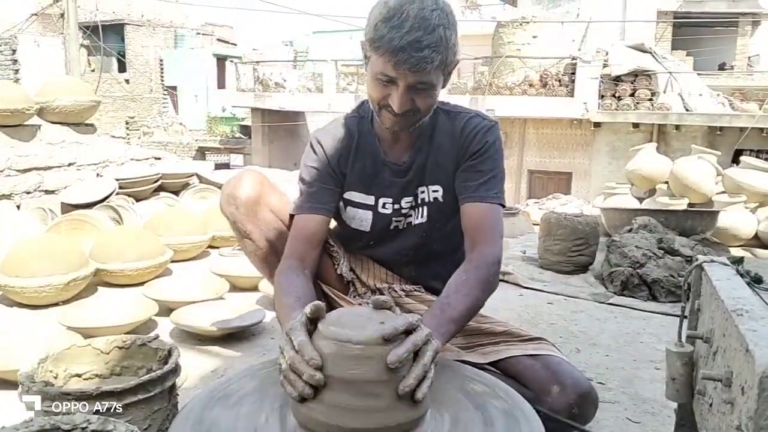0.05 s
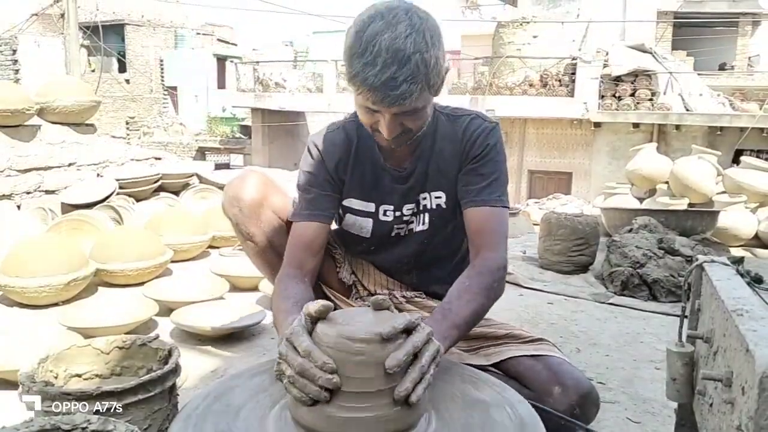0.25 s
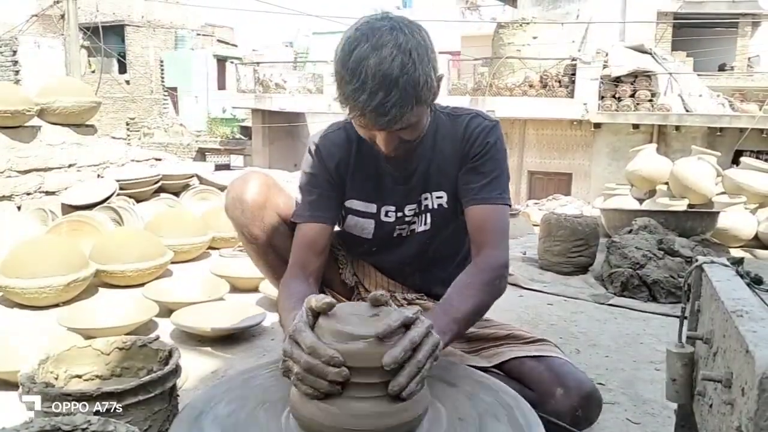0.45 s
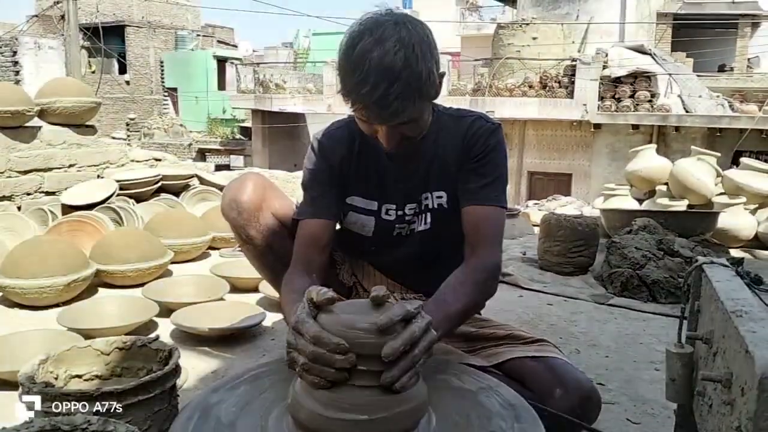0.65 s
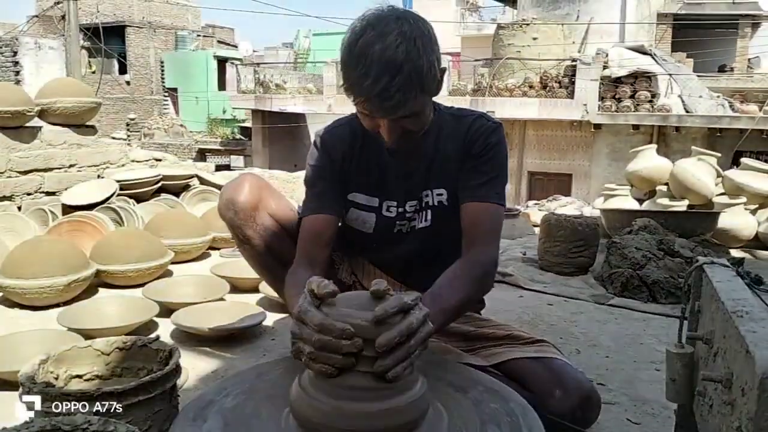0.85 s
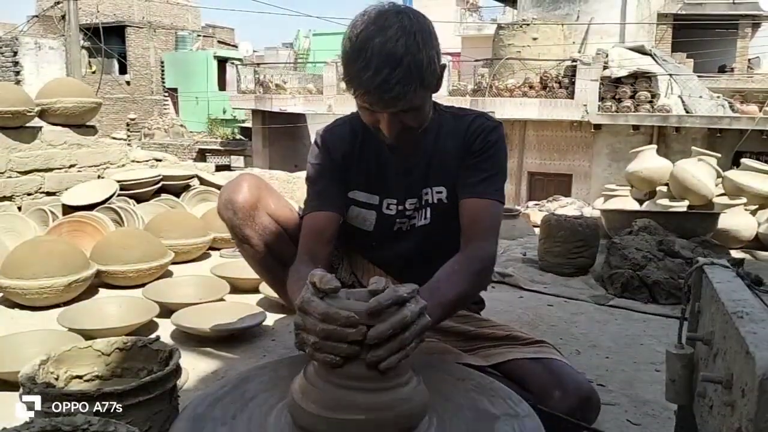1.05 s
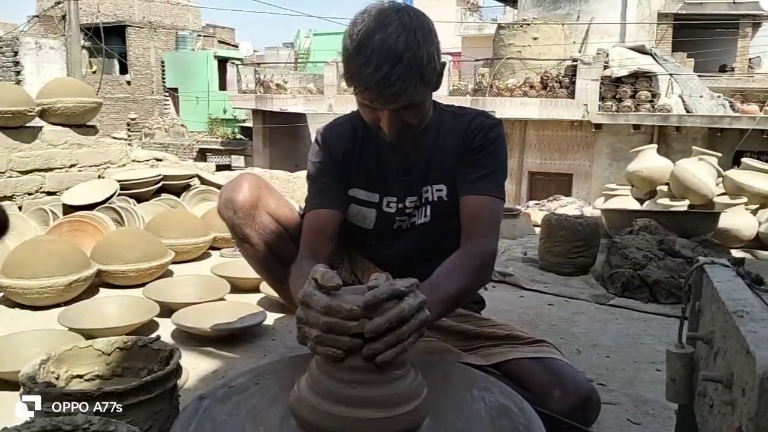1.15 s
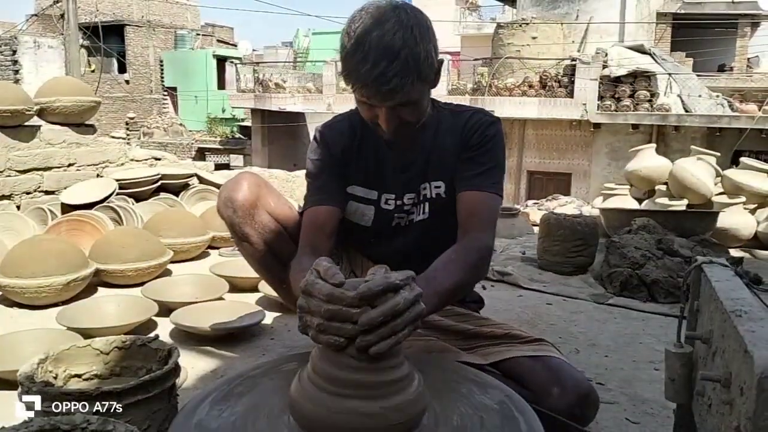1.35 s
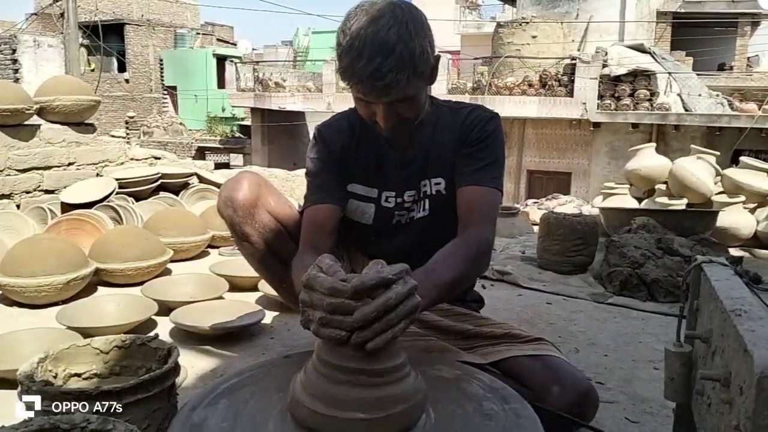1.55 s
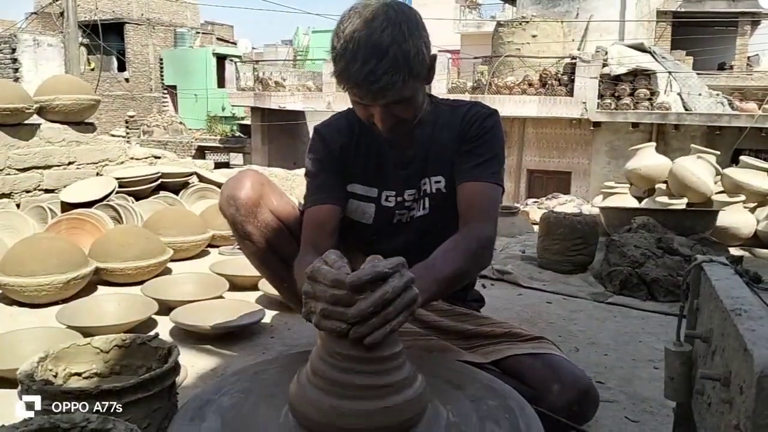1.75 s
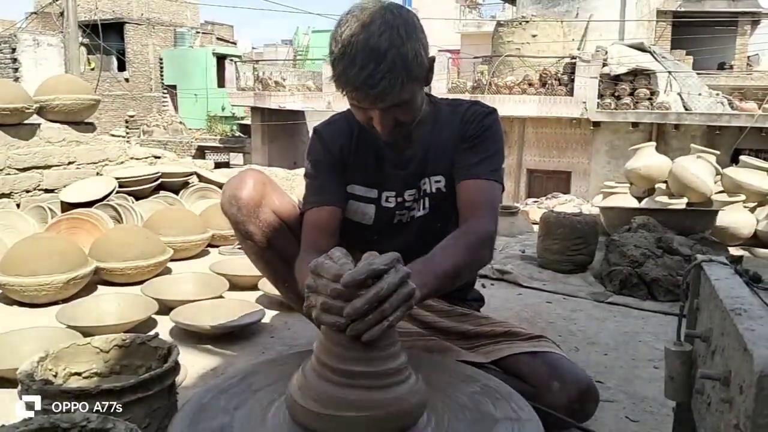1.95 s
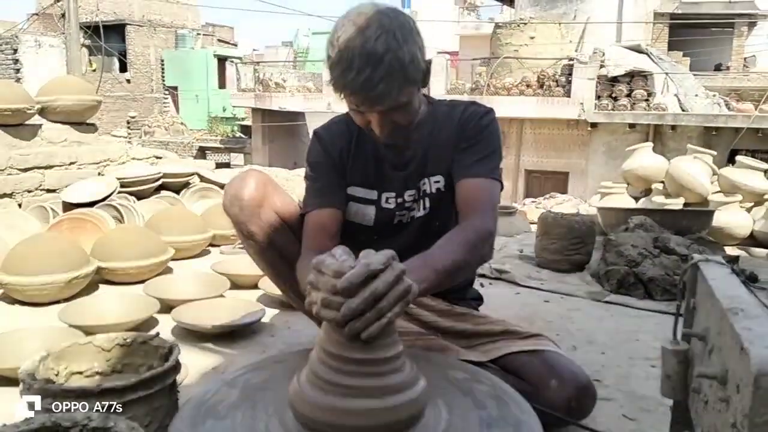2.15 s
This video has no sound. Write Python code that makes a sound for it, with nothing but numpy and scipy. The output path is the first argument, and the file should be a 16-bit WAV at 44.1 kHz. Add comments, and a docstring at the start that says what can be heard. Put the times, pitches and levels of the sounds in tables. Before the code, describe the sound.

Steady low rumble and wet rubbing of clay on a spinning potter's wheel in an open yard. A tap, a hard double clack and a dull pot knock come before the middle, then rough wind batters the close microphone and eases.

```python
"""Shaft hum, a low rumble and the hiss of wet clay on a motor-driven potter's wheel in an open yard come first.
Hum is a few sine harmonics; ticks at set angles of each turn, a ringing frame and clay rub are filtered noise.
Gusts of wind, bands and bursts of noise plus short swings, buffet the microphone, hardest past the middle.
Later a light tap, hard clacks and a hollow pot knock: noise cracks with decaying modes, scattered by the yard."""
import sys
import numpy as np
from scipy import signal
from scipy.fft import rfft, irfft
from scipy.io import wavfile
from scipy.ndimage import uniform_filter1d, minimum_filter1d

SR = 44100
rng = np.random.default_rng(int(sys.argv[2]) if len(sys.argv) > 2 else 0)


def transcribe(u):
    """Save the signal u as a 16-bit wav file named by the first command-line argument.

    u: samples, shape (n,) or (channels, n), limited to [-1, 1]; the rate is SR.
    q: integer samples, one column per channel.
    """
    v = np.clip(np.atleast_2d(u).T, -1, 1)
    q = np.round(v * 32767).astype(np.int16)
    wavfile.write(sys.argv[1], SR, q)


N = 97020


def undb(db):
    """dB to amplitude."""
    return 10 ** (np.asarray(db) / 20)


def unit(x):
    """Scale to an RMS of 1."""
    return x / np.sqrt(np.mean(x ** 2))


def curve(rows):
    """Rows (s, value) joined by straight lines."""
    return np.interp(np.arange(N) / SR, *np.array(rows).T)


def butter(x, order, hz, kind="low"):
    """Butterworth filter."""
    return signal.sosfilt(signal.butter(order, hz, kind, fs=SR, output="sos"), x)


def colour(x, points):
    """Causal, minimum-phase filter through (Hz, dB) points, by folding the cepstrum."""
    hz, db = np.array(points).T
    size = 2 * len(x)
    f = np.maximum(np.fft.rfftfreq(size, 1 / SR), 1)
    gain = undb(np.interp(np.log(f), np.log(hz), db))
    cepstrum = irfft(np.log(gain))[:len(x)]
    cepstrum[1:] *= 2
    response = np.exp(rfft(cepstrum, size))
    return irfft(rfft(x, size) * response)[:len(x)]


def resonate(x, hz, width_hz):
    """One resonance."""
    return signal.lfilter(*signal.iirpeak(hz, hz / width_hz, fs=SR), x)


def walk(rate_hz):
    """Slow random drift with an RMS near 1."""
    k = int(SR / rate_hz)
    steps = np.repeat(rng.standard_normal(N // k + 1), k)
    return unit(uniform_filter1d(uniform_filter1d(steps, k), k)[:N])


SHAFT_HZ = 24.715
# motor hum: shaft_multiple, level_db
HUM_HARMONICS = [(3, -38), (4, -45.5), (5, -45), (12, -61)]


def hum():
    """Harmonics of the shaft rate share one slightly wandering phase."""
    phase = 2 * np.pi * np.cumsum(SHAFT_HZ * (1 + 0.0018 * walk(3))) / SR
    out = np.zeros(N)
    for multiple, level_db in HUM_HARMONICS:
        start_phase = 2 * np.pi * rng.random()
        out += undb(level_db) * np.sqrt(2) * np.sin(multiple * phase + start_phase)
    return out


# rough spots of the drive: angle_turns, strike_db
ROUGH_SPOTS = [(.07, -8), (.17, -8), (0.431, 6), (0.599, -12), (0.692, -5), (0.842, 3.5)]
TICK_SCATTER_DB, TICK_JITTER_S, TICK_DECAY_S = 2.4, 0.00037, 0.0006


def drive_contact():
    """Rough spots strike near the same angles each turn, unequally hard; each strike decays fast."""
    angle_turns, strike_db = np.array(ROUGH_SPOTS).T
    turns = np.arange(int(N / SR * SHAFT_HZ) + 1)[:, None]
    late, strength = rng.standard_normal((2, len(turns), len(angle_turns)))
    start_s = (turns + angle_turns) / SHAFT_HZ + TICK_JITTER_S * late
    at = (start_s * SR).astype(int)
    size = undb(strike_db + TICK_SCATTER_DB * np.clip(strength, -2, 2))
    heard = (at >= 0) & (at < N)
    pulses = np.bincount(at[heard], size[heard], N)
    return signal.lfilter([1], [1, -np.exp(-1 / (TICK_DECAY_S * SR))], pulses)


# dry tick spectrum: freq_hz, gain_db
TICK_SPECTRUM = [(2000, 6), (5500, 11), (8000, 4), (10300, -33.5), (11500, 4.5), (13500, 2), (16000, 2.5)]
# tick level: time_s, level_db
TICK_LEVEL_DB = [(0, -59.5), (.5, -55.5), (.9, -61), (1.25, -59), (1.7, -62.5), (2.2, -61)]


def ticks(contact):
    """Each strike is a brief burst of noise."""
    return undb(curve(TICK_LEVEL_DB)) * unit(colour(contact * rng.standard_normal(N), TICK_SPECTRUM))


def rattle_envelope(contact):
    """Drive roughness: the level follows the strikes slightly and drifts at random."""
    pulse_level = signal.detrend(unit(uniform_filter1d(contact, size=180)))
    return unit(undb(0.25 * pulse_level + 1.06 * walk(45.14)))  # both factors in dB


# frame resonances: freq_hz, width_hz, level_db
FRAME_MODES = [(690, 90, 0), (811.5, 23, 5.5), (1226, 9.8, -3.5), (1950, 13, -3), (1922, 4.9, 5.5),
               (2280, 9.7, 4), (2360, 16, -12.5), (2712, 37, 6), (3200, 58, -10.5), (4890, 42, -5.5)]
FRAME_DB = -45.5


def frame(rattle, load):
    """Rattling noise from the drive rings the frame's resonances, scaled by the clay load."""
    drive = rattle * rng.standard_normal(N)
    rings = [undb(level_db) * unit(resonate(drive, hz, width_hz)) for hz, width_hz, level_db in FRAME_MODES]
    return undb(FRAME_DB) * unit(load) * unit(sum(rings))


# wheel and wet clay rubbing: freq_hz, gain_db
RUB_SPECTRUM = [(200, 9.5), (500, -3), (780, 7), (930, -8.5), (1100, 0), (1650, 0), (2200, 3), (2900, -2),
                (3900, -3), (4550, -12), (5400, -13), (6800, -19), (8500, -39), (9600, -56), (10800, -54.5),
                (11500, -36), (13300, -35.5), (15800, -37)]
GRIT_DB, GRIT_SPREAD_DB, GRAINS_PER_S = -13.5, 2.7, 900


def rub(rattle, load):
    """Friction noise plus sparse grit grains of uneven size."""
    grain_gain = undb(GRIT_SPREAD_DB * np.minimum(rng.exponential(size=N), 4))
    grit = (rng.random(N) < GRAINS_PER_S / SR) * rng.standard_normal(N) * grain_gain
    friction = rattle * rng.standard_normal(N)
    return load * unit(colour(friction + undb(GRIT_DB) * unit(grit), RUB_SPECTRUM))


# clay load on the wheel: time_s, rub_level_db
CLAY_LOAD_DB = [(0, -37), (.5, -36), (.9, -38), (1.01, -35), (1.1, -37), (1.3, -37), (1.5, -40.5),
                (1.85, -40), (2.2, -39.5)]


def wheel():
    """Shaft hum, ticking drive, ringing frame and gritty rub; one roughness drives frame and rub."""
    contact = drive_contact()
    rattle = rattle_envelope(contact)
    load = undb(curve(CLAY_LOAD_DB))
    return hum() + ticks(contact) + frame(rattle, load) + rub(rattle, load)


# treble of the wet slip: time_s, level_db
FIZZ_LEVEL_DB = [(0, -75), (.7, -72), (1.0, -70), (1.3, -66.5), (1.42, -68), (1.55, -74.5), (1.85, -70),
                 (2.2, -72)]
FIZZ_EDGE_HZ = 11500


def fizz():
    """Tiny bubbles bursting in the slip under the fingers, as flickering high-passed noise."""
    spray = butter(rng.standard_normal(N), 4, FIZZ_EDGE_HZ, "high")
    return undb(curve(FIZZ_LEVEL_DB) + 1.5 * walk(120)) * unit(spray)


# motor rumble through the stand: freq_hz, gain_db
DRONE_SPECTRUM = [(15, -36.5), (28, -13), (55, -10.5), (80, 0), (125, -1.5), (185, -3), (240, -16),
                  (320, -27.5), (600, -46.5), (3000, -89)]
DRONE_DB = -34


def drone():
    """The motor shakes the stand: a low rumble of noise, its level partly evened out."""
    shake = colour(rng.standard_normal(2 * N), DRONE_SPECTRUM)[N:]
    power = uniform_filter1d(shake ** 2, size=1400)
    return undb(DRONE_DB) * unit(shake / power ** .3)


# slow swell of the wind: time_s, level_db
GUST_LEVEL_DB = [(0, -43), (.12, -35.5), (.2, -43), (.36, -24.5), (.45, -25), (.6, -38.5), (.75, -24.5),
                 (.85, -39.5), (.98, -28.5), (1.15, -23.5), (1.3, -16), (1.45, -20), (1.55, -24),
                 (1.65, -17), (1.78, -35.5), (1.89, -29.5), (2.02, -26), (2.13, -47), (2.2, -25)]
# turbulence bands: centre_hz, breeze_db, growth_db_per_gust_db
TURBULENCE_BANDS = [(25.5, -17, 0.2), (41.4, -17.5, 0), (70.6, -7.5, 0.27), (112, -2.5, 0.82),
                    (164, -4.5, 1.43), (240.3, -17, 1.7), (340, -23, 0.5), (464.5, -30.5, 1.7),
                    (706, -40, 5.7), (1000, -46, 0)]
BREEZE_DB, WIND_FLICKER_DB = -17.5, 2
WIND_STEADY = 0.46  # 0 leaves each band's swells, 1 flattens them


def wind():
    """Turbulence on the microphone: bands of noise, each growing with the gust at its own rate."""
    gust_db = curve(GUST_LEVEL_DB) - BREEZE_DB + WIND_FLICKER_DB * walk(70)
    out = np.zeros(N)
    for hz, breeze_db, growth in TURBULENCE_BANDS:
        band = butter(rng.standard_normal(2 * N), 3, [hz / 1.334, hz * 1.291], "band")[N:]
        swell = np.sqrt(uniform_filter1d(band ** 2, size=1500))
        out += unit(band / swell ** WIND_STEADY) * undb(BREEZE_DB + breeze_db + growth * gust_db)
    return out


# wind buffets: start_s, hold_s, level_db, upper_edge_hz
WIND_BUFFETS = [(.213, 0.024, -19, 185), (.305, .035, -20, 188), (.347, 0.034, -16, 171),
                (.449, .01, -21, 281), (0.475, 0.0086, -21.5, 260), (0.628, 0.0081, -19.5, 138),
                (.73, 0.046, -22.5, 205), (0.901, .05, -20.5, 170), (1.011, 0.034, -15, 111),
                (1.06, 0.011, -17, 248), (1.086, .018, -22.5, 282), (1.138, 0.019, -16.5, 324),
                (1.162, 0.034, -13.5, 227), (1.205, 0.03, -15.5, 250), (1.257, 0.023, -11, 400),
                (1.287, 0.023, -8, 400), (1.312, .016, -10.5, 170.6), (1.338, 0.028, -11.5, 382),
                (1.393, 0.0145, -22.5, 530), (1.412, 0.017, -10.5, 280), (1.437, 0.018, -10, 350),
                (1.465, 0.024, -9, 239), (1.522, 0.042, -17.5, 287), (1.578, 0.011, -19, 280),
                (1.599, .025, -11.5, 368), (1.644, 0.0071, -14, 375), (1.709, 0.02, -20, 191),
                (1.924, 0.031, -18, 190), (1.969, 0.028, -25, 260)]
BUFFET_ATTACK_S, BUFFET_RELEASE_S, BUFFET_WIDTH_OCTAVES = 0.0015, 0.0046, 1.73


def buffets():
    """Bursts of turbulence catch the microphone suddenly, hold a moment and let go."""
    t = np.arange(SR // 4) / SR
    out = np.zeros(N + len(t))
    for start_s, hold_s, level_db, hz in WIND_BUFFETS:
        swirl = butter(rng.standard_normal(2 * len(t)), 4, hz)
        swirl = butter(swirl, 2, hz / 2 ** BUFFET_WIDTH_OCTAVES, "high")[len(t):]
        swirl = swirl / np.sqrt(uniform_filter1d(swirl ** 2, size=700))
        release = np.exp(-np.maximum(t - hold_s, 0) / BUFFET_RELEASE_S)
        shape = np.minimum(t / BUFFET_ATTACK_S, 1) * release
        at = int(start_s * SR)
        out[at:at + len(t)] += undb(level_db) * shape * swirl
    return out[:N]


# single eddies thumping the microphone: start_s, level_db, swing_hz
WIND_EDDIES = [(0.348, -7, 135), (.372, -5.5, 83), (0.509, -6.5, 116), (.763, -6, 97.5),
               (1.066, -10.5, 213), (1.165, 0, 164), (1.224, -8.5, 150), (1.261, 0, 252), (1.296, -1, 220),
               (1.309, -3.5, 160), (1.338, -7, 180), (1.44, -2, 260), (1.601, -10, 302), (1.619, -8, 200),
               (1.646, -6, 204)]
EDDY_CYCLES = 0.37  # from onset to envelope peak


def eddies():
    """Each eddy is a short swing of pressure that dies within a couple of cycles."""
    out = np.zeros(N)
    for start_s, level_db, hz in WIND_EDDIES:
        cycles = np.maximum(np.arange(N) / SR - start_s, 0) * hz
        age = cycles / EDDY_CYCLES
        out += undb(level_db) * age * np.exp(1 - age) * np.sin(2 * np.pi * cycles)
    return out


WIND_SKEW = 0.21  # strong pushes come out sharper than pulls


def air():
    """All wind on the microphone; a squared term makes pressure grow faster than flow."""
    flow = wind() + buffets() + eddies()
    return flow + WIND_SKEW * butter(flow ** 2, 2, 250, "high")


CONTACT_S = 0.0014


def blows(events, modes, crack_spectrum, crack_t60_s, ring_db):
    """Every blow is a short crack and the ring of the struck body; softer contacts are duller."""
    t = np.arange(SR // 2) / SR
    ring = np.zeros(len(t))
    for hz, mode_db, t60_s in modes:
        decay = np.exp(-np.log(1000) * t / t60_s)
        ring += undb(mode_db + ring_db) * decay * np.sin(2 * np.pi * hz * t)
    out = np.zeros(N + len(t))
    for start_s, level_db, edge_hz in events:
        crack = unit(colour(rng.standard_normal(len(t)), crack_spectrum))
        crack = crack * np.exp(-np.log(1000) * t / crack_t60_s)
        blow = (crack + ring) * np.minimum(t / CONTACT_S, 1)
        at = int(start_s * SR)
        out[at:at + len(t)] += undb(level_db) * butter(blow, 2, edge_hz)
    return out[:N]


# dull crack of a soft contact, for taps and knocks: freq_hz, gain_db
KNOCK_SPECTRUM = [(300, -5), (550, -4), (800, -3.5), (1400, -1.5), (2400, -6.5), (3400, -2), (4600, -25.5),
                  (9000, -55), (16000, -60)]
KNOCK_T60_S = 0.04
# light tap on fired clay: start_s, level_db, upper_edge_hz
TAP_EVENTS = [(.622, -31.5, 2500)]
# fired clay modes: freq_hz, mode_db, t60_s
FIRED_CLAY_MODES = [(1040, -1.5, 0.075), (1110, -1, 0.054), (1314, -6, .05)]


def taps():
    """A light tap rings a few modes of fired clay."""
    return blows(TAP_EVENTS, FIRED_CLAY_MODES, KNOCK_SPECTRUM, KNOCK_T60_S, ring_db=2)


# hard clacks: start_s, level_db, upper_edge_hz (lower for a softer contact)
CLACK_EVENTS = [(.7113, -16.5, 14000), (.7186, -20, 14000), (.7445, -27.5, 8000), (.8814, -34, 5020),
                (.9193, -33, 3000), (1.0026, -35.5, 5000), (1.2535, -34.5, 4000), (1.822, -35.5, 5000),
                (2.1031, -36, 4000), (2.1455, -39, 4500)]
# modes of the hard body: freq_hz, mode_db, t60_s
HARD_BODY_MODES = [(551, -2, .07), (975, -1.5, 0.033), (1183, -4, 0.066), (1505, -0.5, 0.034),
                   (1885, -1.5, .045), (2760, -0.5, 0.032), (2847, -3, .045), (3433, -1.5, 0.03),
                   (3840, -5, .04), (4408, -8, .04)]
# crack of the hard contact: freq_hz, gain_db
CLACK_SPECTRUM = [(300, 1), (1200, 0), (4200, 7), (5500, -9), (8000, -18.5), (10300, -34.5), (13000, -6),
                  (16000, -22)]


def clacks():
    """Hard contacts with a bright crack and a short ring."""
    return blows(CLACK_EVENTS, HARD_BODY_MODES, CLACK_SPECTRUM, crack_t60_s=0.028, ring_db=-4)


# knock on a pot, then its softer settling contact: start_s, level_db, upper_edge_hz
KNOCK_EVENTS = [(.8118, -20.5, 4200), (.8198, -22.5, 1500)]
# hollow pot modes: freq_hz, mode_db, t60_s
HOLLOW_POT_MODES = [(383, 13.5, 0.039), (406, 4, 0.099), (540, 7, 0.077), (1086, -4.5, 0.052),
                    (1222, -2, 0.04), (1554, -10, 0.044), (1667, -2.5, 0.075), (2625, -16.5, .06),
                    (3200, 3, .015)]


def knocks():
    """A hollow pot rings mainly in its low modes, then settles with a second, soft contact."""
    return blows(KNOCK_EVENTS, HOLLOW_POT_MODES, KNOCK_SPECTRUM, KNOCK_T60_S, ring_db=-3.5)


YARD_GAIN, YARD_T60_S, YARD_GAP_S = 0.1262, 0.41, 0.008  # gain: about -18 dB


def yard(x):
    """Short, dull scatter from walls and stacked pots: convolution with a decaying noise tail."""
    t = np.arange(SR // 2) / SR
    noise = resonate(rng.standard_normal(len(t)), 1300, 2500)
    tail = noise * np.exp(-np.log(1000) * t / YARD_T60_S) * (t > YARD_GAP_S)
    return x + YARD_GAIN * signal.fftconvolve(x, tail / np.linalg.norm(tail))[:N]


def scene():
    """Wheel, slip, motor and wind throughout; only the blows are scattered by the yard."""
    struck = yard(taps() + clacks() + knocks())
    return (wheel() + fizz() + drone() + air() + struck)[None]


def record(dry):
    """A limiter holds the strongest peaks under full scale; a steep low-pass cuts the top."""
    ceiling, top_hz = .95, 15750
    needed_gain = ceiling / np.maximum(abs(dry), ceiling)
    gain = uniform_filter1d(minimum_filter1d(needed_gain, size=600), size=300)
    limited = dry * uniform_filter1d(gain, size=300)
    return signal.sosfilt(signal.ellip(10, .2, 80, top_hz, fs=SR, output="sos"), limited)


dry = scene()
out = record(dry)
transcribe(out)
```